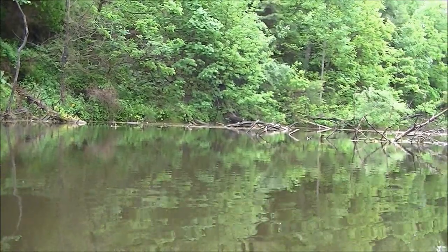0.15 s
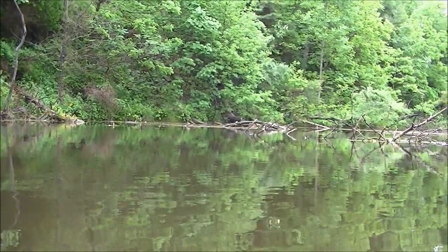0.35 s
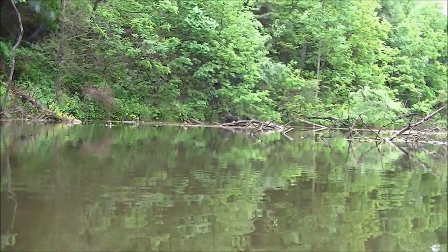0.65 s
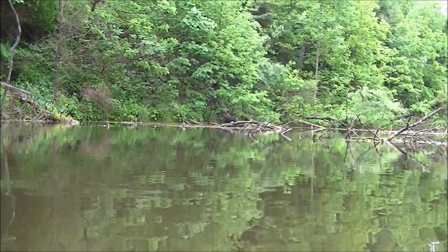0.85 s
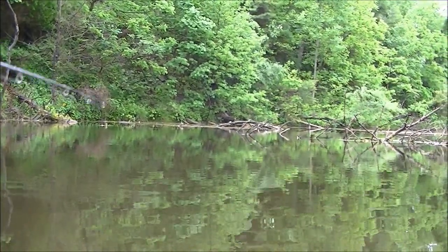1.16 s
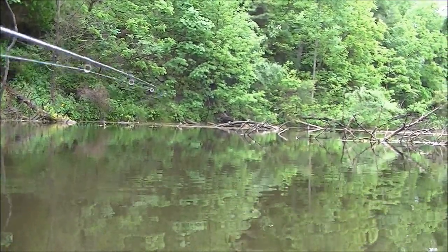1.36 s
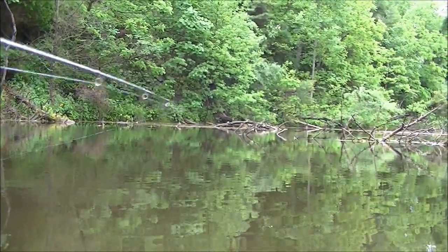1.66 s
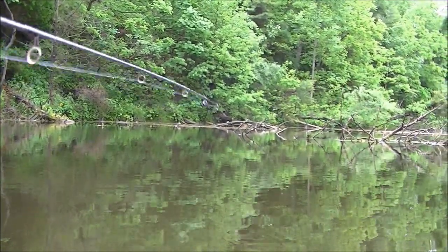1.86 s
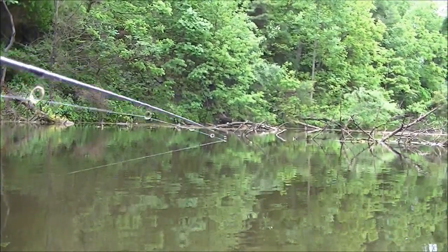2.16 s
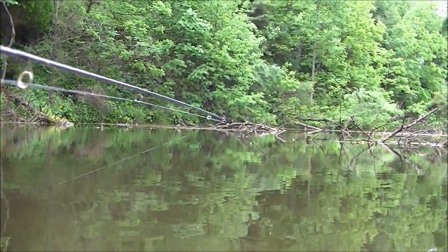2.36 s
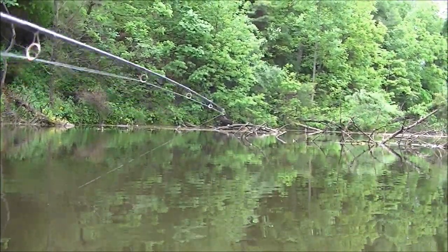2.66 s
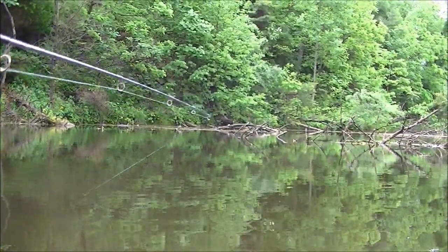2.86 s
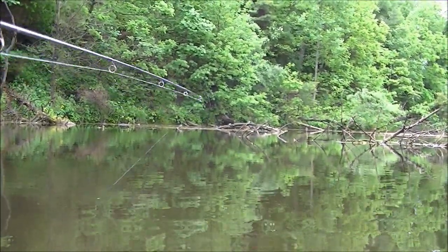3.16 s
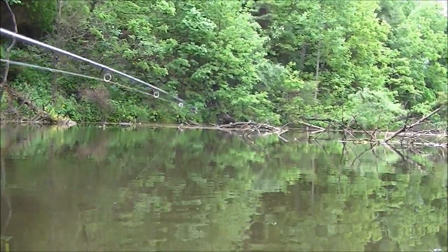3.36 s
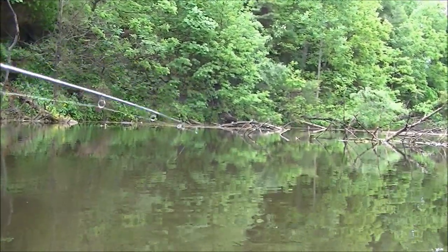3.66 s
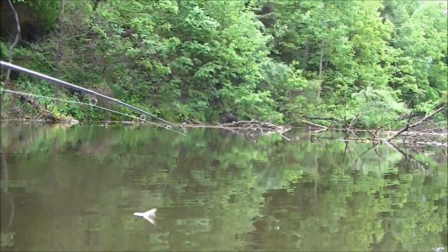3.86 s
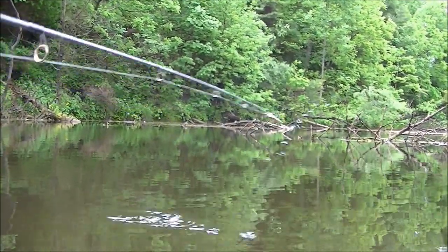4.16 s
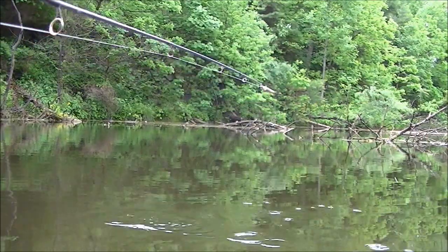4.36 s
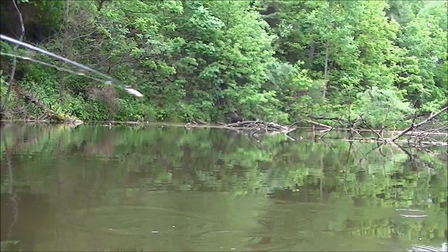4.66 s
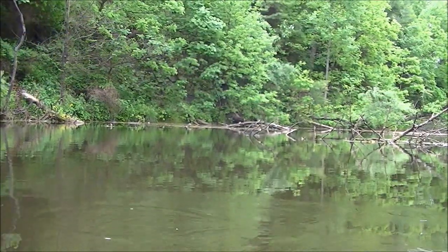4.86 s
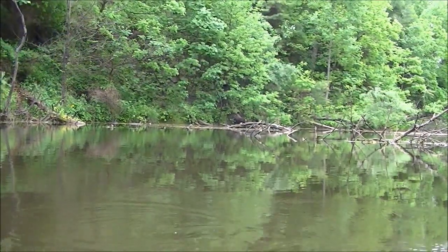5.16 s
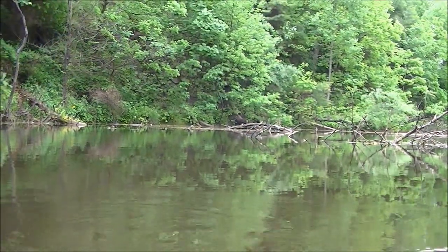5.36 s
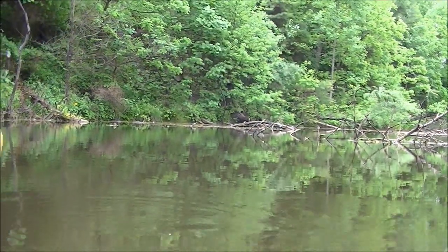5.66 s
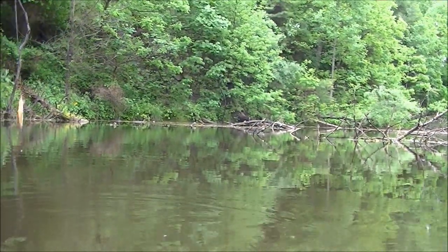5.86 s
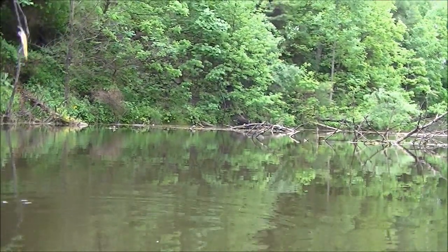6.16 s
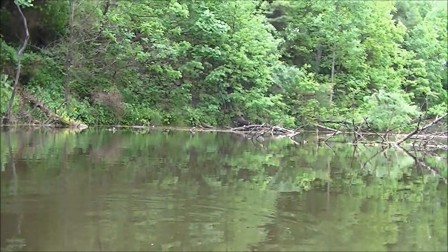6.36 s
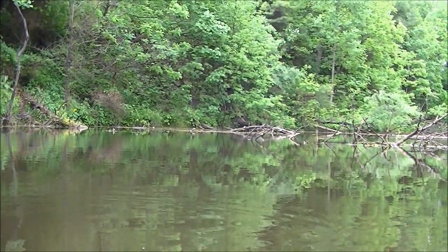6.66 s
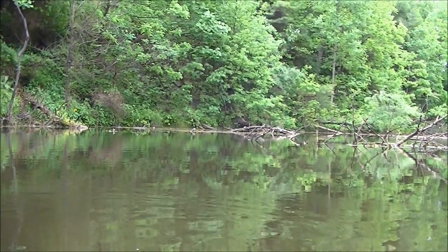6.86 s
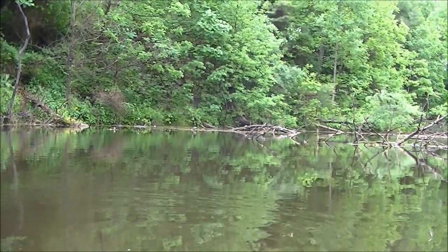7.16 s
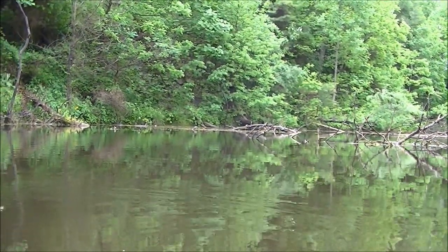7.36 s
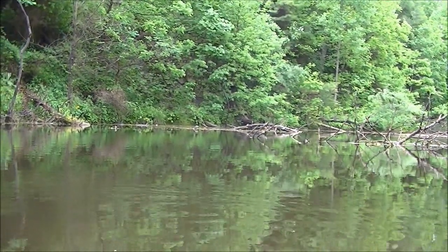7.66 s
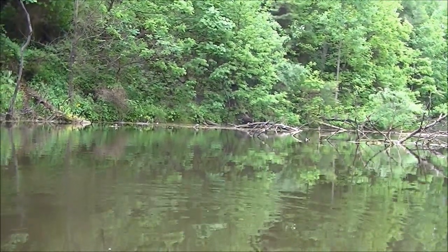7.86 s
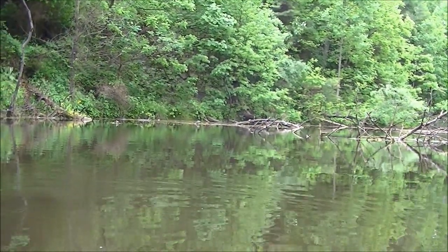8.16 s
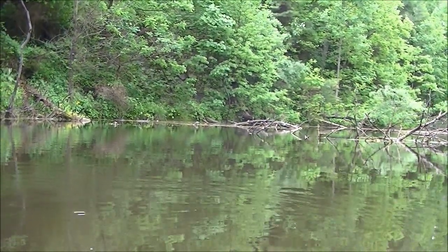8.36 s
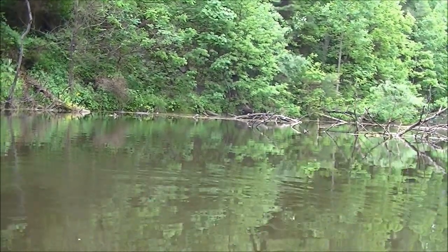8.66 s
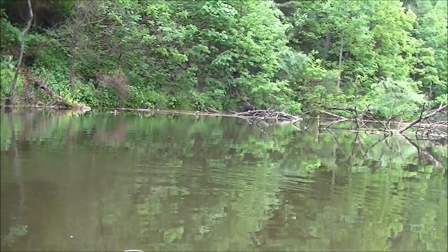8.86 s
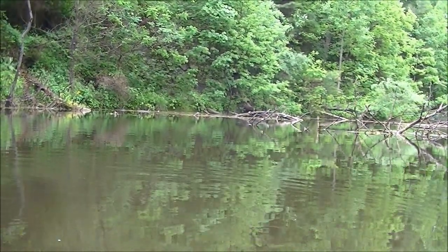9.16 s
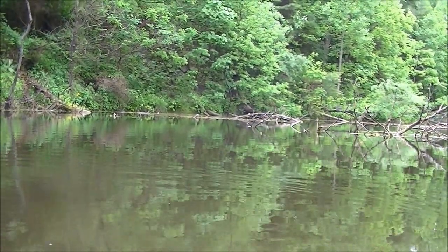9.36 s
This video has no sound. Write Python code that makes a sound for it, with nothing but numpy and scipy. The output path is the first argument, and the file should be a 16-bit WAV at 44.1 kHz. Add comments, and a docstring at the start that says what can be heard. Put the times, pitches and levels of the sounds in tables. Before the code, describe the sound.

A close fishing reel whirs softly for the first four and a half seconds, with light tackle knocks. Treefrogs trill and peep faintly until 2 seconds, and a faint, echoing bird sings near 1 second over a soft forest hush. Just after 4 seconds a lure leaves the pond with two quick bubbly slaps and a trail of drops. The bird sings again around 4.6 seconds, and the drag ratchets rapidly from about 5 to 5.5 seconds. From 6 seconds a small frog ticks faintly, speeding up, while a distant two-note bird and a far treefrog briefly join. At 7.5 seconds the bail snaps open with a sharp click, the loudest sound. Around 8.2 seconds the rod swishes with a cluster of clicks, and line hisses off the spool, falling and fading by 9 seconds, amid the bird's third song and a few frog-like pips.

```python
"""Fishing on a calm forest pond. A reel's gears whir and the tackle knocks, while treefrogs trill and
a bird sings over soft forest air. The lure leaves the water with two bubbly slaps and a trail of drops.
The bird sings again and the reel's brake, the drag, ratchets. A small frog starts ticking; a far bird
and a far treefrog join in. The bail, the wire arm that holds the line, clicks open. Amid the bird's
third song and a few frog-like pips, the rod swishes and the line hisses off the spool."""
import sys
import numpy as np
from scipy import signal
from scipy.fft import rfft, irfft
from scipy.io import wavfile
from scipy.ndimage import uniform_filter1d

SR = 44100
rng = np.random.default_rng(int(sys.argv[2]) if len(sys.argv) > 2 else 0)


def unload_wav(signal):
    """Save mono or channel-first audio to the path in sys.argv[1] as 16-bit WAV at rate SR, clipped to [-1, 1]."""
    wavfile.write(
        sys.argv[1],
        SR,
        np.round(np.clip(np.atleast_2d(signal).T, -1, 1) * 32767).astype(np.int16),
    )


N = 419832
T = np.arange(N) / SR


def reel():
    """Turning gears make the reel's case ring with a throbbing whir, until the lure is out."""
    # loudness of the winding: (time [s], level [dB])
    winding = [(0.0, -68), (0.65, -65), (1.02, -71), (2.11, -70), (2.4, -64.5), (4.07, -71.5), (4.3, -72),
               (4.6, -86)]
    # tones the case rings at: (pitch [Hz], width [Hz], level [dB])
    case_modes = [(2780, 450, -4), (3600, 110, 2.5), (4450, 290, 2), (6610, 230, 0), (6950, 160, 0),
                  (7500, 620, -5), (9330, 340, -3.5), (11300, 280, -2.5), (12800, 400, -10)]
    throb_db = 1.5 * noise_band(hz=30, width_hz=25.04)
    gears = rng.standard_normal(N)
    whir = 0
    for k, mode in enumerate(case_modes):
        waver_db = 2.1 * noise_band(hz=0, width_hz=9)
        whir += (-1) ** k * resonate(gears, [mode]) * amp(waver_db)
    return amp(curves(winding)[0] + throb_db) * unit(whir)


def knocks_and_pips():
    """Light tackle knocks, two thin high ticks, and a few late, short frog-like pips near 1.4 kHz."""
    # light knocks and late frog-like pips: (time [s], level [dB], pitch [Hz])
    blips = [(0.2778, -39.5, 1490), (0.4319, -37.5, 2200), (0.6055, -41, 1670), (0.7673, -34.5, 2160),
             (0.8994, -44, 1410), (0.9164, -37.5, 2060), (1.33, -40.5, 2640), (1.4052, -38, 2350),
             (1.6639, -36.5, 2260), (1.7643, -40, 1400), (2.0783, -44, 2480), (2.8514, -45, 2440),
             (2.9106, -45.5, 1710), (3.2807, -38.5, 2300), (3.4412, -43.5, 1770), (7.961, -41.5, 1430),
             (8.013, -45, 2750), (8.036, -43, 1360), (8.985, -45.5, 1460)]
    # thin ticks: (time [s], peak level [dB])
    thin_ticks = [(2.165, -45), (2.325, -47)]
    out = np.zeros(N)
    faint_knocks = scattered_events(span_s=(.5, 3.4), db=-47.5, hz=1850, count=8)
    for s, db, hz in [*blips, *faint_knocks]:
        modes = [(hz, 330, 0), (3600, 2500, -21)]
        add(out, s + .001045, strike(db + .7, modes, contact_s=.0024, grit=1))
    for s, db in thin_ticks:
        add(out, s, strike(db, [(14500, 2500, 0)], contact_s=.001, grit=.5))
    return out


def splash(db, rise_s, decay_s, centre_hz, thud_db, count=72, size=4000):
    """One hit on the water rings a cloud of tiny bubbles, with a hiss of spray and a dull thud."""
    t = T[:size]
    since = np.maximum(t - rise_s, 0)
    # a quick slap, then a weak patter
    shape = np.minimum(t / rise_s, 1) * (np.exp(-since / decay_s) + amp(-15.5) * np.exp(-since / .025))
    spread = .28 * np.clip(rng.standard_normal((count, 1)), -2, 2)
    hz = np.minimum(centre_hz * np.exp(spread), SR / 3)
    born = rng.uniform(0, 1, (count, 1)) ** 2 * (rise_s + 4 * decay_s)
    age = np.maximum(t - born, 0)
    strength = np.interp(born, t, shape) * rng.choice([-1, 1], (count, 1))
    bubbles = (strength * np.sin(2 * np.pi * hz * age) * np.exp(-age * centre_hz / 12)).sum(axis=0)
    spray = shape * resonate(rng.standard_normal(size), [(5340, 2700, .5), (11500, 2500, .2)])
    thud = shape * resonate(rng.standard_normal(size), [(596, 320, 0)])
    sound = unit(bubbles) + amp(-8.5) * unit(spray) + amp(thud_db) * unit(thud)
    return amp(db) * sound / np.abs(sound).max()


def lure():
    """The lure slaps the water twice, and drops fall back into the pond."""
    # slaps: (time [s], level [dB], rise [s], decay [s], bubble pitch [Hz], thud level [dB])
    slaps = [(4.0998, -16.7, 0.0011, 0.006, 3380, -42), (4.191, -19.5, 0.00455, 0.00456, 2700, -13)]
    # falling drops: (time [s], level [dB], bubble pitch [Hz])
    drops = [(4.176, -40, 3450), (4.224, -32.5, 4900), (4.235, -31.5, 5200), (4.256, -39, 4000),
             (4.292, -39.5, 5100), (4.311, -45, 5500), (4.324, -38.5, 5850), (4.399, -38, 2780),
             (4.464, -41, 4730), (4.493, -41.5, 4470)]
    droplets = scattered_events(span_s=(3.8, 4.55), db=-47.5, hz=4380, count=7)
    out = np.zeros(N)
    for s, *slap in slaps:
        add(out, s, splash(*slap))
    for s, db, hz in [*drops, *droplets]:
        add(out, s, splash(db, rise_s=.0014, decay_s=.0052, centre_hz=hz, thud_db=-26))
    return cut_lows(out, hz=250)


def drag():
    """Pulled line makes a small catch click over a toothed wheel, louder when it runs faster."""
    # speed of the pull: (time [s], clicks [1/s])
    pull = [(5.0837, 32.5), (5.137, 60), (5.235, 102), (5.40, 118), (5.465, 99), (5.525, 57)]
    # tones the drag rings at: (pitch [Hz], width [Hz], level [dB])
    drag_modes = [(1384, 66, 1.5), (2430, 310, -5), (2950, 190, 1.5), (3670, 260, -2.5), (4580, 63, 0),
                  (4815, 26, 14), (5760, 1450, 0), (7100, 930, -0.5), (7450, 39, 4), (9300, 2600, -5),
                  (12600, 600, -3.5), (15000, 1400, -12.5)]
    clicks, scrape_level = np.zeros(N), np.zeros(N)
    # between clicks the catch scrapes up the next tooth
    scrape = unit(resonate(rng.standard_normal(N), drag_modes))
    pull_s, rate = np.transpose(pull)
    for s in beats(pull):
        speed = np.interp(s, pull_s, rate) / rate.max()
        db = -32 + 20 * np.log10(speed ** .72) + 1.9 * rng.standard_normal()
        add(clicks, s, strike(db, drag_modes, contact_s=.0013, grit=.75))
        add(scrape_level, s, amp(db) * np.exp(-T[:2000] / .0073))
    return clicks + amp(-20.5) * scrape_level * scrape


def bail_and_guides():
    """The bail snaps open, and the line flicks the guides, the rings along the rod."""
    # hard clicks: (time [s], peak level [dB])
    clicks = [(6.044, -44.5), (7.4896, -11.5), (7.5064, -26.5), (7.6262, -31), (7.807, -44), (8.146, -43),
              (8.2332, -17.5), (8.255, -21), (8.26, -17), (8.2646, -19), (8.279, -25), (8.737, -41)]
    # tones the bail and guides ring at: (pitch [Hz], width [Hz], level [dB])
    bail_modes = [(1260, 150, -18.5), (2410, 380, -18.5), (3660, 210, -8), (4310, 170, -3.5),
                  (6340, 380, -1.5), (7260, 650, -8.5), (8430, 820, -11), (12100, 740, -12.5),
                  (14700, 1200, -22)]
    out = np.zeros(N)
    for s, db in clicks:
        add(out, s, strike(db, bail_modes, contact_s=.0026, grit=.062))
    return out


def rod_swing():
    """The rod leaves swirls of air that sound higher and louder as its thin tip whips past."""
    # the broad rush of air: (frequency [Hz], level [dB])
    swish = [(100, -62), (200, -31), (350, -18), (550, -7.5), (1000, -9), (1700, -6), (2700, -8),
             (4000, -7.5), (5500, -5), (8000, -19), (15000, -24)]
    loudest_s, rise_db_per_s, fall_db_per_s = 8.213, 465, 350
    fastest_s, whip_s, slow_hz, fast_hz = 8.211, .027, 1203, 3050
    db = -24 - np.maximum(rise_db_per_s * (loudest_s - T), fall_db_per_s * (T - loudest_s))
    hz = slow_hz + (fast_hz - slow_hz) / (1 + ((T - fastest_s) / whip_s) ** 2)
    # the main tone stands out only at the fastest part of the swing
    tones = (hz / hz.max()) ** 2 * noise_band(hz, 560) + amp(-9) * noise_band(1.75 * hz, 600)
    return amp(np.maximum(db, -200)) * (tones + amp(-3.5) * noise(swish))


def flying_line():
    """The line jerks off the spool; as it slows, its hiss gets quieter, lower and narrower."""
    release_s, flight_s, jerk_s, rise_db_per_s = 8.238, .94, .014, 480
    slow_hz, fast_hz = 1694, 10920
    flown_s = np.maximum(T - release_s, 0)
    speed = np.clip(1 - flown_s / flight_s, 0, 1)
    jerk = np.exp(-flown_s / jerk_s)
    db = -42.5 + 5 * jerk - rise_db_per_s * np.clip(release_s - T, 0, .5)
    hz = slow_hz + (fast_hz - slow_hz) * speed
    width_hz = 4300 * (speed + .5 * jerk)
    rub = noise([(100, -40), (300, -14), (1500, -5.5), (3000, -2),
                 (6000, -1), (11000, -10), (16000, -19)])
    # loose coils tick against the guides and flutter
    touches = (rng.random(N) < 160 / SR) * rng.standard_normal(N) + 1e-18
    ticks = amp(-11.5) * unit(resonate(touches, [(6430, 1900, .21), (11500, 3500, -4)]))
    hiss = amp(-3.5) * noise_band(hz, width_hz) + amp(-1.5) * noise_band(hz, 1.7 * width_hz)
    flutter = amp(1.6 * noise_band(0, 250) + 1.2 * noise_band(0, 45) - .1)
    return amp(db) * speed ** 2.34 * ((hiss + amp(-7.5) * rub) * flutter + ticks)


def treefrogs(pulse_s=.012, fade_db_per_s=11, harmonics_db=(0, -2, -17, -22, -24)):
    """Treefrogs trill in even, slowly fading runs of short pulses, and add longer peeps."""
    # trills: (first pulse [s], last pulse [s], pulses [count], level [dB], pitch [Hz])
    trills = [(.04, 0.059, 2, -44.8, 1460), (.11, .11, 1, -46.5, 1380), (.158, .18, 2, -46.5, 1427),
              (.227, .273, 2, -47, 1410), (.316, .528, 10, -48.5, 1399), (1.488, 1.85, 20, -50.8, 1330)]
    # peeps after a trill: (middle time [s], level [dB], pitch [Hz], nominal length [s])
    peeps = [(0.577, -43, 1341, 0.018), (.727, -42, 1320, .022), (2, -44, 1285, .026)]
    out, pulses = np.zeros(N), []
    for first, last, count, db, hz in trills:
        for s in np.linspace(first, last, round(count)):
            pulse_db = db - fade_db_per_s * (s - first) + 1.1 * rng.standard_normal()
            pulses.append((s, pulse_db, hz * (1 + .015 * rng.standard_normal()), pulse_s))
    for s, db, hz, length_s in [*pulses, *peeps]:
        position = np.linspace(-1, 1, int(1.5 * length_s * SR))
        # the shorter the pulse, the more its pitch rises
        glide = 6 * (.00249 / length_s) ** 2 * position
        pitch = hz * (1 + glide + .28 * rng.standard_normal(len(position)))
        phase = 2 * np.pi * np.cumsum(pitch) / SR
        tone = sum(amp(level) * np.sin(k * phase) for k, level in enumerate(harmonics_db, 1))
        add(out, s - len(tone) / SR / 2, amp(db + 1) * np.cos(position * np.pi / 2) ** 4 * tone)
    return out


def small_frog(pitch_hz=3600, tick_s=.006):
    """A small frog on the bank ticks a little unevenly, getting faster and louder."""
    # pace of the ticking: (time [s], ticks [1/s], peak level [dB])
    ticking = [(5.76, 3.3, -54.5), (9.45, 7.5, -48.5)]
    out, t = np.zeros(N), T[:int(tick_s * SR)]
    tick = np.hanning(len(t)) * np.sin(2 * np.pi * pitch_hz * t)
    db = curves(ticking)[1]
    for s in beats(ticking):
        early, louder = rng.standard_normal(2)
        add(out, s - .03 * early, amp(np.interp(s, T, db) + 1.5 * louder) * tick)
    return out


def whistle(length_s, pitches_hz, db, quaver, size=8000):
    """One bird note swells and fades as it glides through its pitches with a slight wobble."""
    progress = np.linspace(0, 1, min(int(length_s * SR), size))
    wobble = unit(uniform_filter1d(rng.standard_normal(size), size=80))[:len(progress)]
    hz = np.interp(progress, np.linspace(0, 1, len(pitches_hz)), pitches_hz)
    phase = 2 * np.pi * np.cumsum(hz * (1 + quaver * wobble)) / SR
    return amp(db) * signal.windows.tukey(len(progress), .35) * np.sin(phase)


def near_bird():
    """A bird sings three times; nearby leaves smear each note and far trunks add a long echo."""
    # notes: (time into the song [s], length [s], start [Hz], middle [Hz], end [Hz], level [dB])
    phrase = [(0, 0.041, 4060, 3573, 3860, 1.5), (0.041, .095, 4098, 3397, 3010, -2.5),
              (.209, .038, 4850, 4400, 4150, 1.5), (0.27, 0.0224, 3433, 3273, 3260, -2),
              (.335, .055, 3700, 3093, 2810, -1), (0.414, 0.0474, 2535, 2200, 2007, -5),
              (.5, .05, 1900, 2300, 2520, -5), (0.668, .035, 1650, 1740, 1890, -10.5),
              (.738, .036, 5530, 4716, 4670, 2)]
    # songs: (time [s], level [dB])
    songs = [(.757, -52.5), (4.624, -53), (8.01, -51.5)]
    voice = np.zeros(N)
    for start, song_db in songs:
        for s, length_s, *hz, db in phrase:
            add(voice, start + s, whistle(length_s, hz, song_db + db, quaver=.023))
    leaves = amp(-8) * echoes(voice, fade_s=.12, dull_hz=9000)
    trunks = amp(-5) * echoes(voice, fade_s=1.8, dull_hz=4630)
    return amp(1) * voice + leaves + trunks


def far_birds(start_s=6.215, period_s=.226, first_db=-69.5, growth_db=2.5):
    """An echoing two-note see-saw grows louder; one stray call sounds during it and two just after."""
    # the two notes: (time into the pair [s], level [dB], start [Hz], end [Hz])
    pair = [(0, 0.5, 5520, 4130), (.077, -2.5, 5970, 6780)]
    # stray calls: (time [s], level [dB], start [Hz], end [Hz])
    calls = [(7.059, -63, 4730, 3580), (7.85, -63, 6920, 5860), (7.871, -58.5, 4330, 3640)]
    seesaw = [(start_s + k * period_s + s, first_db + k * growth_db + db, *hz)
              for k in range(6) for s, db, *hz in pair]
    voice = np.zeros(N)
    for s, db, *hz in [*seesaw, *calls]:
        add(voice, s, whistle(.055, hz, db, quaver=.0503))
    return amp(-1.5) * voice + amp(-.5) * echoes(voice, fade_s=1, dull_hz=8800)


def far_treefrog():
    """A far treefrog's trill blurs into a drone."""
    # loudness of the drone: (time [s], level [dB])
    drone = [(6.4, -92), (6.6, -65), (7.4, -66), (7.7, -76)]
    return amp(curves(drone)[0]) * (noise_band(2650, 420) + amp(-10) * noise_band(1330, 260))


def forest_air():
    """The air gives a steady hush, with a low rustle that swells and sinks."""
    # the hush: (frequency [Hz], level [dB])
    hush = [(18, -61), (30, -31), (53, -42), (112, -9), (239, -4.5), (394, -6.5), (740, -5.5),
            (1100, -10.5), (2060, -10.5), (2540, -9.5), (3670, -11), (5450, -16), (6900, -18), (14000, -26),
            (16000, -29)]
    # the low rustle: (frequency [Hz], level [dB])
    rustle = [(24, -77), (40, -41), (133, -8), (246, 2.5), (331, -3), (440, -9.5), (490, -7), (591, -12.5),
              (686, -21), (1000, -26), (1300, -53), (2200, -120)]
    # loudness of the rustle: (time [s], level [dB])
    swell = [(0.0, -68), (2.62, -62), (2.86, -65), (3.79, -56.5), (4.03, -58.5), (5.09, -65.5), (5.73, -68),
             (6.12, -63), (6.79, -71.5), (7.74, -66.5), (7.95, -68.5), (8.43, -67), (8.72, -70),
             (9.52, -71)]
    return amp(-61) * noise(hush) + amp(curves(swell)[0] + .5) * noise(rustle)


def echoes(x, fade_s, dull_hz):
    """Sound bounces off trunks and banks, dying away by 60 dB in fade_s."""
    t = T[:SR]
    tail = rng.standard_normal(SR) * amp(-60 * t / fade_s) * (1 - np.exp(-t / .0057))
    tail = signal.sosfilt(signal.butter(2, dull_hz, fs=SR, output="sos"), tail)
    return signal.oaconvolve(x, tail / np.linalg.norm(tail))[:N]


def strike(db, modes, contact_s, grit, size=4000):
    """A short, gritty pulse rings a set of tones, peaking at db."""
    force = grit * rng.standard_normal(size) * np.exp(-np.arange(size) / SR / contact_s)
    force[0] += 1
    sound = resonate(force, modes)
    return amp(db) * sound / np.abs(sound).max()


def resonate(x, modes):
    """Let x ring a set of tones (pitch [Hz], width [Hz], level [dB]), added with alternating signs."""
    out = 0
    for k, (hz, width, db) in enumerate(modes):
        r = np.exp(-np.pi * width / SR)
        ring = signal.lfilter([1, 0, -1], [1, -2 * r * np.cos(2 * np.pi * hz / SR), r * r], x)
        out += (-1) ** k * amp(db) * (1 - r * r) / 2 * ring
    return out


def noise(spectrum):
    """Noise shaped by rows of (frequency [Hz], level [dB])."""
    hz, db = np.transpose(spectrum)
    bins_hz = np.arange(N // 2 + 1) * SR / N
    gain = amp(np.interp(np.log(bins_hz + 1), np.log(hz), db))
    return unit(irfft(rfft(rng.standard_normal(N)) * gain, N))


def noise_band(hz, width_hz):
    """A band of noise whose centre and width may move; at 0 Hz it is a random waver."""
    steps = np.cumsum(np.broadcast_to(width_hz, N)) / SR
    a, b = (np.interp(steps, np.arange(len(p)), p) for p in rng.standard_normal((2, N // 2)))
    phase = 2 * np.pi * np.cumsum(np.broadcast_to(hz, N)) / SR
    return unit(a * np.cos(phase) + b * np.sin(phase))


def beats(rows):
    """Times of a beat whose pace follows rows of (time [s], beats [1/s])."""
    s, rate = np.transpose(rows)[:2]
    t = np.arange(s[0], s[-1], 1 / SR)
    turns = np.cumsum(np.interp(t, s, rate)) / SR
    return np.interp(np.arange(int(turns[-1]) + 1), turns, t)


def scattered_events(span_s, db, hz, count):
    """Small random events spread over a span: (time [s], level [dB], pitch [Hz])."""
    when, size, pitch = rng.uniform(0, 1, (count, 3)).T
    s = span_s[0] + (span_s[1] - span_s[0]) * (np.arange(count) + when) / count
    return zip(s, db + 5 * (size - .5), hz * 2 ** (pitch - .5))


def cut_lows(x, hz):
    """Turn down everything below hz."""
    return signal.sosfilt(signal.butter(2, hz, "high", fs=SR, output="sos"), x)


def curves(rows):
    """Join the rows of a table by straight lines in time."""
    s, *columns = np.transpose(rows)
    return [np.interp(T, s, c) for c in columns]


def add(track, s, sound):
    """Mix a short sound in at time s."""
    at = max(round(s * SR), 0)
    track[at:at + len(sound)] += sound[:max(N - at, 0)]


def amp(db):
    """Turn decibels into a volume factor."""
    return 10 ** (np.asarray(db) / 20)


def unit(x):
    """Scale to an average (rms) level of 1."""
    return x / np.sqrt(np.mean(x ** 2) + 1e-20)


def scene():
    """Close tackle and water with faint echoes, animals around the pond, and forest air behind."""
    near = reel() + knocks_and_pips() + bail_and_guides() + drag() + lure()
    near += cut_lows(rod_swing() + flying_line(), hz=150)
    near += amp(-25.5) * echoes(near, fade_s=.64, dull_hz=4970)
    frogs = treefrogs() + small_frog()
    # leaves scatter mostly the high tones, so the frogs' echoes are thin and bright
    frogs += amp(-6) * echoes(cut_lows(frogs, hz=2200), fade_s=1, dull_hz=4970)
    return (near + frogs + near_bird() + far_birds() + far_treefrog() + forest_air())[None]


def record(dry, cutoff_hz=15900):
    """The very highest treble is cut off steeply."""
    return signal.sosfilt(signal.ellip(10, .1, 70, cutoff_hz, fs=SR, output="sos"), dry)


dry = scene()
out = record(dry)
unload_wav(out)
```